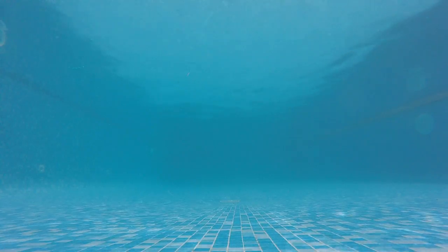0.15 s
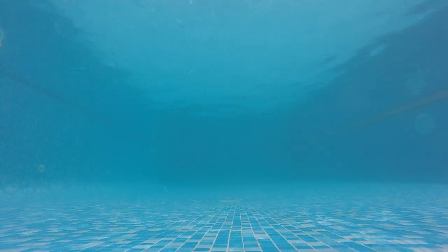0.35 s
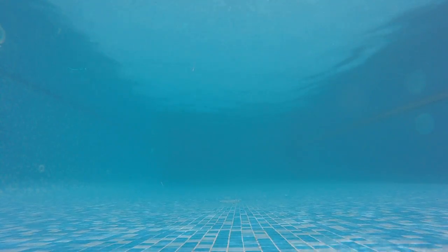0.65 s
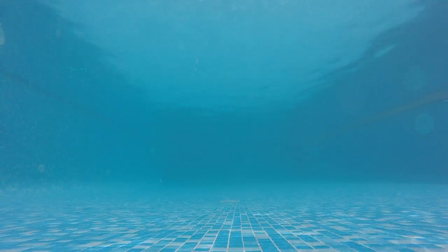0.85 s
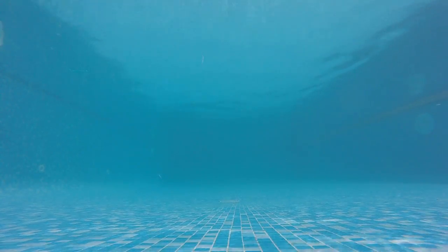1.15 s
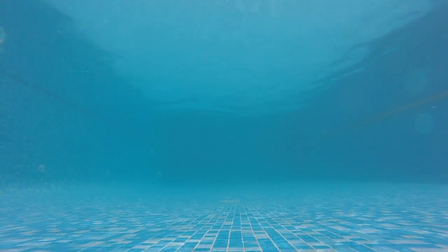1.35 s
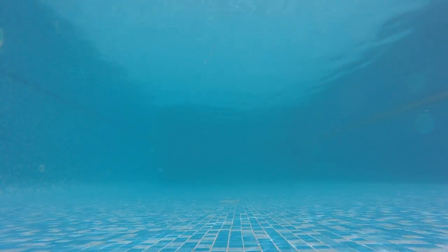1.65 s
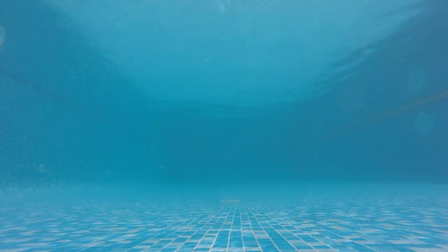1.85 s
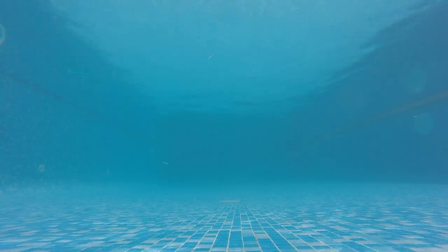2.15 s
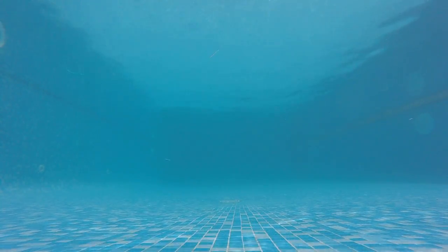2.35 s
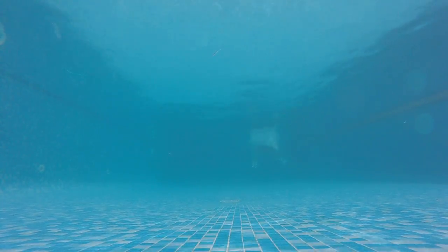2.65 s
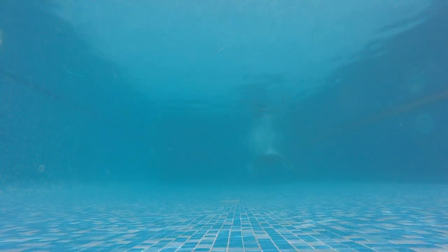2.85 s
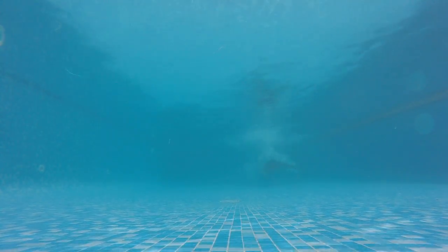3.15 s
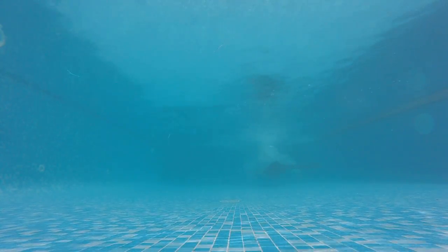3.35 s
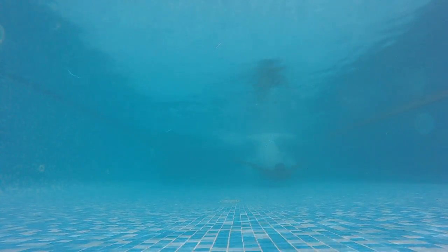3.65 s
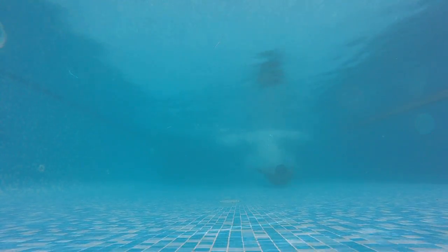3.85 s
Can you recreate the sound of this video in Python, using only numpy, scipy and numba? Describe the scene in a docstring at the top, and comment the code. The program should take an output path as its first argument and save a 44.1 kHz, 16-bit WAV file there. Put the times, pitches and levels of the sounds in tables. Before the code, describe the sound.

Underwater pool water gurgles and plops in scattered bursts over a soft hum, then a sudden dive splash thuds and releases a fizzing cloud of bubbles that thins out; dull, boxy sound from a submerged small camera.

```python
"""A pump hums and water gurgles and drips at the gutter of a swimming pool, heard from its floor; then a swimmer
dives in at the far end: a slap, booming air pockets, and a cloud of bubbles that fizzes and rushes.
Bubbles are decaying sines, alone or in random swarms; water and pump are shaped noise; slaps are noise bursts.
The ears are a small camera in its housing: many bubbles sit near its resonance around 540 Hz,
the spectra lean away from the treble, and a low-pass removes the very top."""
import sys
import numpy as np
from scipy import signal
from scipy.fft import rfft, irfft
from scipy.io import wavfile
from scipy.ndimage import uniform_filter1d
from numba import njit

SR = 44100
rng = np.random.default_rng(int(sys.argv[2]) if len(sys.argv) > 2 else 0)


def dump(signal):
    """Clip the signal to [-1, 1] and save it as 16-bit WAV at the path in sys.argv[1]."""
    limited = np.clip(np.atleast_2d(signal).T, -1, 1)
    pcm = np.round(limited * 32767).astype(np.int16)
    wavfile.write(sys.argv[1], SR, pcm)


N = 176400  # samples, 4 s

# Spectrum of the pool's rumble and hiss. Each row: frequency in Hz, relative density in dB per Hz.
WATER_COLOUR = [(12, -42.5), (20, 3.5), (97, -6), (150, -11), (203, -3), (370, -7), (556, 1), (731, -14),
                (837, -26.5), (1130, -33), (1290, -36.5), (1480, -29.5), (5960, -40.5), (11800, -51.5),
                (13500, -78)]
# Pump tones. Each row: centre in Hz, level in dB rms, width in Hz between the half-amplitude points.
PUMP_TONES = [(99.1, -51.5, 3.7), (200.4, -52, 5.3), (5960, -82, 52)]
# Gurgling over time. Each row: time in seconds, level in dB.
GURGLE_LEVEL = [(.04, -49), (.5, -42), (.72, -44.5), (.76, -34.5), (.92, -37.5), (.95, -45.5),
                (1.08, -37.5), (1.12, -33), (1.2, -39), (1.25, -37.5), (1.42, -36.5), (1.5, -39.5),
                (1.62, -42), (1.75, -33), (1.95, -42), (2.15, -40.5), (2.22, -43.5), (2.53, -40),
                (2.575, -30.5), (2.7, -26.5), (2.78, -31), (2.86, -29), (3.0, -32), (3.15, -37),
                (3.45, -32), (3.57, -42.5), (3.7, -34.5), (3.83, -35), (3.93, -29.5), (4, -35)]
# Spectrum of the gurgle. Each row: frequency in Hz, relative level in dB.
GURGLE_COLOUR = [(250, -6.5), (372, -10.5), (470, -4.5), (533, 1), (599, -2.5), (682, -7.5), (760, -11.5),
                 (870, -22), (1100, -34)]
# Trickling over time. Each row: time in seconds, level in dB.
TRICKLE_LEVEL = [(.04, -63), (.6, -61.5), (.75, -59.5), (1.05, -61.5), (1.12, -53.5), (1.25, -56.5),
                 (1.33, -60.5), (1.37, -49), (1.47, -57), (1.51, -66.5), (1.58, -64), (1.62, -62),
                 (1.78, -57), (1.84, -63), (2.01, -71), (2.04, -54.5), (2.12, -58.5), (2.2, -63.5),
                 (2.5, -59.5), (3.2, -56), (4, -61)]
# Spectrum of the trickle. Each row: frequency in Hz, relative level in dB.
TRICKLE_COLOUR = [(800, -3.5), (1000, 9.5), (1150, -12.5), (1300, 9.5), (1570, -27.5), (1960, -4.5),
                  (2500, -12), (3700, -13), (6000, -33.5)]
# Tiny bubbles and drips. Each row: start in seconds, level in dB, pitch in Hz, 60 dB decay in seconds.
DRIPS = [(0.0833, -46.5, 2590, 0.033), (0.194, -44, 2530, 0.01), (0.244, -42, 1800, 0.0084),
         (1.092, -48, 1970, 0.035), (1.1484, -47, 2740, 0.042), (1.165, -48, 1900, 0.025),
         (1.193, -52, 2630, 0.03), (1.2377, -48, 3450, 0.025), (1.2875, -48, 2530, 0.021),
         (1.365, -46, 2470, 0.017), (1.3783, -47, 2230, 0.031), (1.413, -52, 3850, 0.023),
         (1.433, -49, 2400, 0.03), (1.468, -44, 2290, 0.048), (1.615, -40, 1790, 0.0099),
         (1.67, -43.5, 2460, 0.036), (1.6976, -47.5, 3140, 0.03), (1.737, -51, 2400, 0.03),
         (1.771, -41, 2330, 0.027), (1.8885, -41, 2290, 0.038), (1.949, -44.5, 1960, 0.034),
         (2.0267, -43, 1800, 0.029), (2.0557, -43.5, 2570, 0.03), (2.0947, -47, 2560, 0.032),
         (2.154, -51, 4600, 0.015), (2.393, -43.5, 2450, 0.027), (2.5202, -40.5, 2130, 0.019),
         (3.331, -42.5, 2800, 0.024), (3.7375, -42, 2570, 0.035), (3.788, -39.5, 2460, 0.026),
         (3.8388, -41, 2390, 0.032), (3.946, -40.5, 2540, 0.021)]
# Single bubbles. Each row: start in seconds, level in dB, pitch in Hz, 60 dB decay in seconds.
BUBBLES = [(0.527, -21, 493, 0.084), (0.55, -33, 465, 0.1), (0.676, -14.5, 481, 0.034),
           (0.738, -21.5, 717, 0.092), (0.807, -17.5, 500, 0.05), (0.815, -15, 566, 0.037),
           (0.827, -25, 507, 0.06), (0.859, -29, 603, 0.15), (0.888, -25, 560, 0.12),
           (0.914, -29, 587, 0.041), (1.121, -31, 636, 0.14), (1.18, -27, 538, 0.14),
           (1.378, -18.5, 620, 0.036), (1.451, -23.5, 525, 0.1), (1.733, -22, 521, 0.11),
           (1.897, -22, 586, 0.056), (2.0275, -17.5, 517, 0.043), (2.059, -27, 785, 0.03),
           (2.093, -23, 690, 0.023), (2.112, -28, 750, 0.041), (2.153, -27.5, 549, 0.09),
           (2.177, -22, 575, 0.062), (2.321, -23, 551, 0.062), (2.375, -19, 583, 0.071),
           (2.588, -15.5, 610, 0.082), (2.605, -12, 584, 0.077), (2.629, -11.5, 576, 0.046),
           (2.669, -19, 460, 0.094), (2.867, -14, 524, 0.056), (2.994, -13.5, 600, 0.041),
           (3.093, -24.5, 574, 0.11), (3.371, -25.5, 556, 0.073), (3.431, -18.5, 644, 0.044),
           (3.487, -18, 544, 0.075), (3.526, -20.5, 420, 0.064), (3.651, -24.5, 500, 0.12),
           (3.739, -22, 552, 0.098), (3.774, -17.5, 492, 0.068), (3.89, -15, 377, 0.04),
           (3.984, -17, 522, 0.15)]
# Mid-sized drips. Each row: start in seconds, level in dB, pitch in Hz, 60 dB decay in seconds.
DROPS = [(0.629, -29, 895, 0.026), (1.028, -28.5, 926, 0.051), (1.118, -25.5, 862, 0.043),
         (1.727, -40, 1230, 0.06), (1.898, -38.5, 1310, 0.056), (2.0934, -29.5, 1270, 0.021),
         (2.2279, -34, 915, 0.036), (2.6062, -20.5, 1280, 0.029), (2.6777, -23, 1010, 0.029),
         (2.84, -23, 955, 0.056), (3.415, -30, 1280, 0.031), (3.4465, -31, 940, 0.036),
         (3.6562, -27.5, 1207, 0.026), (3.805, -35, 1510, 0.017)]
# Large air pockets and surges. Each row: start in seconds, level in dB, pitch in Hz, 60 dB decay in seconds.
BOOMS = [(.75, -24, 214, 0.065), (.81, -29, 241, 0.16), (2.0275, -6.5, 65.4, 0.047),
         (2.0325, -9, 244, 0.02), (2.607, -14.5, 92.8, 0.29), (2.638, -13, 171.4, 0.1),
         (2.666, -15.5, 76, 0.098), (2.67, -13.5, 187, 0.1), (2.715, -22.5, 114, 0.25),
         (2.89, -16, 115, 0.077), (2.965, -16, 117, 0.061), (3.015, -14, 165, 0.059),
         (3.042, -4.5, 50, 0.057), (3.34, -19, 138.6, 0.13), (3.385, -20.5, 134, 0.16),
         (3.425, -18.5, 150, 0.057), (3.908, -11, 176, 0.04)]
# One clear bubble, a single row: start in seconds, level in dB, pitch in Hz, 60 dB decay in seconds,
# time from start to burst in seconds.
PLONK = (1.5335, -13.5, 530, .26, .043)
# Bubble cloud of the dive. Each row: time in seconds, fizz level in dB, rush level in dB, rumble level in dB.
CLOUD_LEVEL = [(2.5, -74, -62, -55), (2.53, -63.5, -54, -56), (2.59, -52, -45, -61),
               (2.62, -50.5, -34.5, -30.5), (2.7, -51.5, -38.5, -42), (2.8, -53, -39.5, -40.5),
               (2.9, -51.5, -42.5, -33.5), (3.0, -52.5, -39.5, -29.5), (3.08, -55.5, -43, -30.5),
               (3.13, -55.5, -55.5, -36.5), (3.25, -57, -46.5, -38), (3.35, -60, -52.5, -39.5),
               (3.42, -56.5, -47.5, -38), (3.5, -57.5, -60, -37), (3.6, -56, -58, -39),
               (3.67, -58, -55, -33), (3.75, -59.5, -53, -35.5), (3.83, -57.5, -47, -39),
               (3.92, -58, -50.5, -31), (4, -60, -45.5, -39.5)]
# Spectrum of the fizz. Each row: frequency in Hz, relative level in dB.
FIZZ_COLOUR = [(1500, -12), (1950, -5), (2150, -9), (2500, 0), (3400, -4), (4900, -9), (5300, -15),
               (7800, -21), (9800, -23), (13000, -30)]
# Spectrum of the sparser pops. Each row: frequency in Hz, relative level in dB.
POP_COLOUR = [(1500, -16), (1950, -4), (2200, -9), (2550, 0), (3200, -4), (5000, -10)]
# Spectrum of the rush. Each row: frequency in Hz, relative level in dB.
RUSH_COLOUR = [(700, 10.5), (950, -3.5), (1100, 0), (1300, -3), (1500, -24)]
# Spectrum of the rumble. Each row: frequency in Hz, relative level in dB.
RUMBLE_COLOUR = [(40, -20), (80, -29), (110, -7.5), (150, 0), (190, -6), (230, -14.5), (350, -8.5)]
# Slaps on the surface. Each row: start in seconds, noise level before the band filter in dB,
# 60 dB decay in seconds.
SLAPS = [(2.6068, -27, .016), (2.608, -36, .07), (2.7283, -33, .007)]

WATER_DB = -41.5  # rms, before the slow swell
RISE_CYCLES = 0.86  # time constant of a swarm bubble's swell, in cycles
GLIDE_PER_CYCLE, DRIP_GLIDE_PER_CYCLE = 0.00076, 0.003  # upward pitch glide, as a fraction per starting cycle
TICK_DB, TICK_T60_S = -3.5, 0.028  # noise crack as a drip lands: level relative to its ring, 60 dB decay
START_S, FADE_IN_S = 0.036, 0.0023
TOP_HZ = 12600


def undb(db):
    """dB to gain."""
    return 10 ** (np.asarray(db) / 20)


def level(x, db):
    """Scale to an rms level in dB."""
    return x * undb(db) / np.sqrt(np.mean(x ** 2))


def curve(table, column):
    """One dB column of a table, drawn as a gain over time."""
    rows = np.array(table)
    return undb(np.interp(np.arange(N) / SR, rows[:, 0], rows[:, column]))


def tint(colour, hz):
    """Level in dB of a spectrum at hz, interpolated over log frequency."""
    rows = np.array(colour)
    return np.interp(np.log(hz), np.log(rows[:, 0]), rows[:, 1])


def walk(rate):
    """A smooth random wander: levels held 1 / rate seconds, then averaged twice over that span."""
    hold = int(SR / rate)
    steps = np.repeat(rng.standard_normal(N // hold + 1), hold)
    return 1.3 * uniform_filter1d(uniform_filter1d(steps, hold), hold)[:N]


@njit
def ring(n, start, size, hz, t60, rise, glide):
    """Each bubble is a sine that swells over a few cycles or less, climbs slightly and dies away."""
    out = np.zeros(n)
    for k in range(len(start)):
        step = 2 * np.pi * hz[k] / SR
        fall = np.exp(-np.log(1000) / (t60[k] * SR))
        soften = np.exp(-hz[k] / (rise * SR))
        climb = 1 + glide * hz[k] / SR
        gain, unswollen, phase = size[k], 1., 0.
        for i in range(start[k], min(n, start[k] + int(t60[k] * SR))):
            out[i] += gain * (1 - unswollen) * np.sin(phase)
            gain *= fall
            unswollen *= soften
            phase += step
            step *= climb
    return out


def single(table, rise, glide=GLIDE_PER_CYCLE):
    """Ring the listed bubbles one by one; rise is the swell in cycles."""
    s, db, hz, t60 = np.array(table, float).T
    return ring(N, (s * SR).astype(np.int64), undb(db), hz, np.clip(t60, .005, 1), rise, glide)


def swarm(colour, per_s, cycles, scatter_db):
    """Random bubbles across a spectrum, each ringing about the same number of cycles; rms 1."""
    when, pitch, size, length = rng.random((4, int(per_s * N / SR)))
    lo, hi = colour[0][0], colour[-1][0]
    hz = lo * (hi / lo) ** pitch
    db = tint(colour, hz) - scatter_db * np.log(1 - size)
    db += 10 * np.log10(hz)  # offsets the even spread over log pitch
    db += 10 * np.log10(hz / cycles)  # offsets the shorter ring of small bubbles
    t60 = cycles * (.5 + length) / hz
    return level(ring(N, (when * N).astype(np.int64), undb(db), hz, t60, RISE_CYCLES, GLIDE_PER_CYCLE), 0)


def cracks(rows, band_hz, order):
    """Noise bursts that start at once and die away exponentially, filtered to a band."""
    t, envelope = np.arange(N) / SR, np.zeros(N)
    for s, db, t60 in rows:
        envelope += undb(db) * (t >= s) * np.exp(-np.log(1000) * np.clip(t - s, 0, 1) / t60)
    band = signal.butter(order, band_hz, "band", fs=SR, output="sos")
    return signal.sosfilt(band, envelope * rng.standard_normal(N))


def noise_spectrum():
    """Spectrum of fresh white noise, ready for shaping."""
    return rfft(rng.standard_normal(N))


def bin_hz():
    """Frequency of each spectrum bin, at least 1 Hz."""
    return np.maximum(np.arange(N // 2 + 1) * SR / N, 1)


def water():
    """Steady rumble and hiss of the pool: noise shaped to a spectrum, swelling a little."""
    bed = irfft(noise_spectrum() * undb(tint(WATER_COLOUR, bin_hz())), N)
    return level(bed, WATER_DB) * undb(.6 * walk(9))


def pump():
    """Wavering pump tones: noise narrowed to resonant peaks."""
    out = np.zeros(N)
    for centre, db, width in PUMP_TONES:
        peak = 1 / (1 + ((bin_hz() - centre) / width * 2) ** 2)
        out += level(irfft(noise_spectrum() * peak, N), db)
    return out


def gutter():
    """Water gurgles and trickles in bursts: two bubble swarms that waver together."""
    gurgle = swarm(GURGLE_COLOUR, 500, 45, 1.31) * curve(GURGLE_LEVEL, 1)
    trickle = swarm(TRICKLE_COLOUR, 2200, 26, 2.1) * curve(TRICKLE_LEVEL, 1)
    return (gurgle + trickle) * undb(0.5 * walk(25))


def drips():
    """Tiny bubbles ring high and glide up, each with a crack of noise as the drip lands."""
    ticks = [(s, db + TICK_DB, TICK_T60_S) for s, db, hz, t60 in DRIPS]
    return single(DRIPS, 2.7, DRIP_GLIDE_PER_CYCLE) + cracks(ticks, (900, 4200), order=2)


def bubbles():
    """Single bubbles ring as softly swelling, dying sines."""
    return single(BUBBLES, 1.32)


def drops():
    """Mid-sized drips swell more slowly, over several cycles."""
    return single(DROPS, 4.2)


def booms():
    """Large air pockets and surges ring low, with a swift swell."""
    return single(BOOMS, .55)


def plonk():
    """One clear bubble whose long ring drops to 30 % of its course as it bursts."""
    start, burst = PLONK[0], PLONK[4]
    t = np.arange(N) / SR
    return single([PLONK[:4]], 1.1) * np.clip(1 - (t - start - burst) / .004, .3, 1)


def dive():
    """The bubble cloud: fine fizz with sparser pops, a rush of mid bubbles and a rumble of large ones."""
    opening = np.clip((np.arange(N) / SR - CLOUD_LEVEL[0][0]) / .03, 0, 1)
    fizz = swarm(FIZZ_COLOUR, 22000, 43, 2.0) * undb(0.76 * walk(25.03)) * curve(CLOUD_LEVEL, 1)
    pops = swarm(POP_COLOUR, 500, 40, 2.4) * undb(-5) * curve(CLOUD_LEVEL, 1)  # follow the fizz
    rush = swarm(RUSH_COLOUR, 1100, 18, 2.4) * undb(2.2 * walk(45)) * curve(CLOUD_LEVEL, 2)
    rumble = swarm(RUMBLE_COLOUR, 600, 6.0, 1.2) * curve(CLOUD_LEVEL, 3)
    return opening * (fizz + pops + rush + rumble)


def slaps():
    """Bright cracks of noise where the body breaks the surface."""
    return cracks(SLAPS, (1200, 3800), order=1)


def scene():
    """All sources summed at the housing, as one channel."""
    background = water() + pump() + gutter()
    singles = drips() + bubbles() + drops() + booms() + plonk()
    return (background + singles + dive() + slaps())[None]


def record(dry):
    """A short silence, a quick fade in, and a steep low-pass that cuts the top."""
    opened = np.clip((np.arange(N) / SR - START_S) / FADE_IN_S, 0, 1)
    low_pass = signal.ellip(8, .2, 60, TOP_HZ, fs=SR, output="sos")
    return signal.sosfilt(low_pass, dry * opened)


dry = scene()
out = record(dry)
dump(out)
```